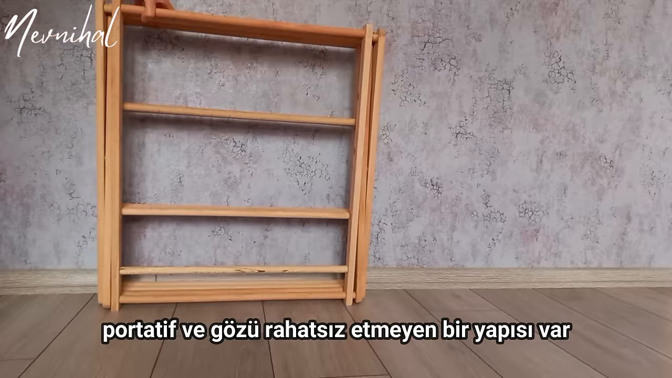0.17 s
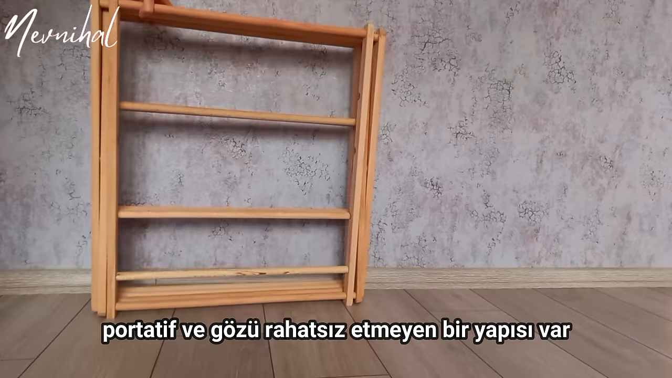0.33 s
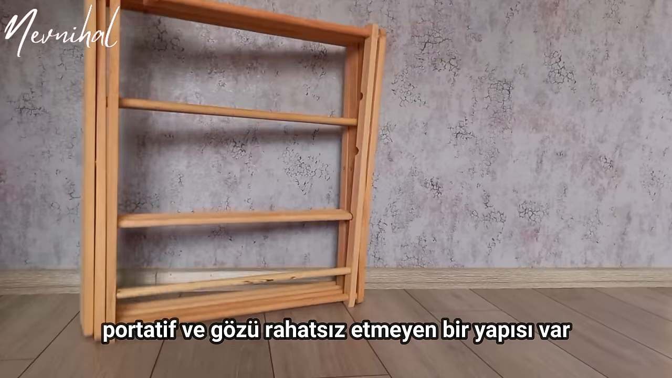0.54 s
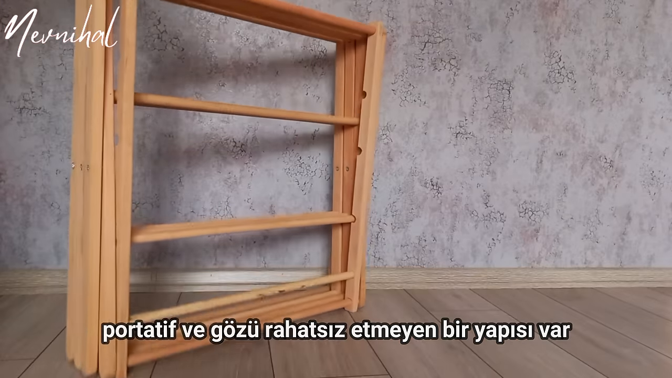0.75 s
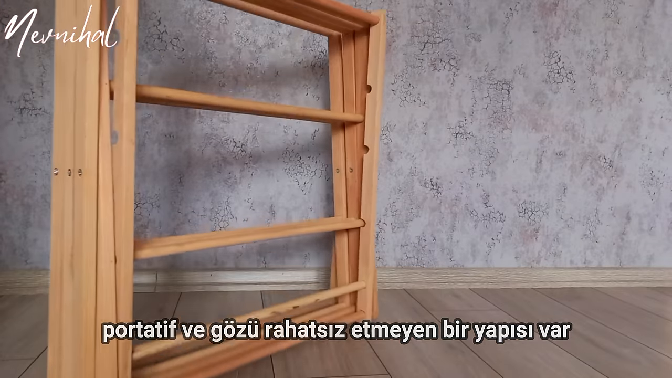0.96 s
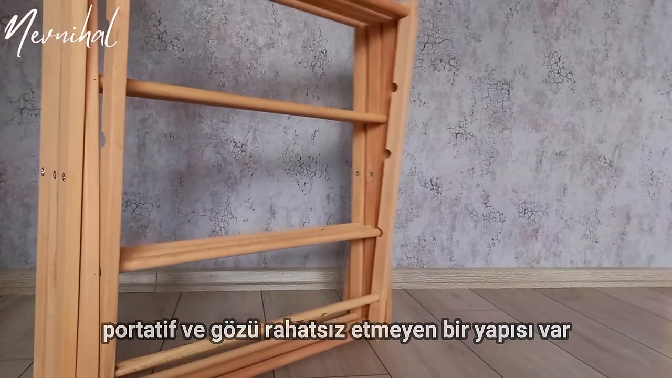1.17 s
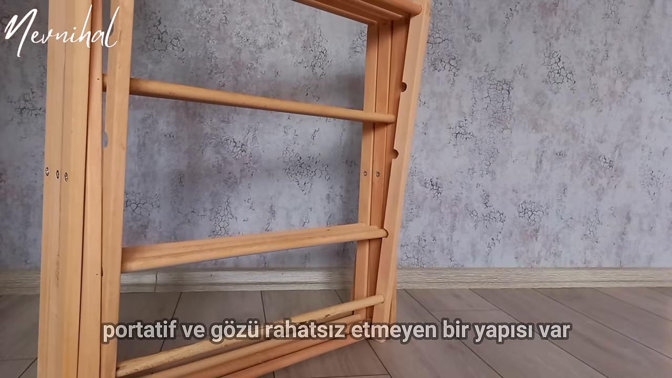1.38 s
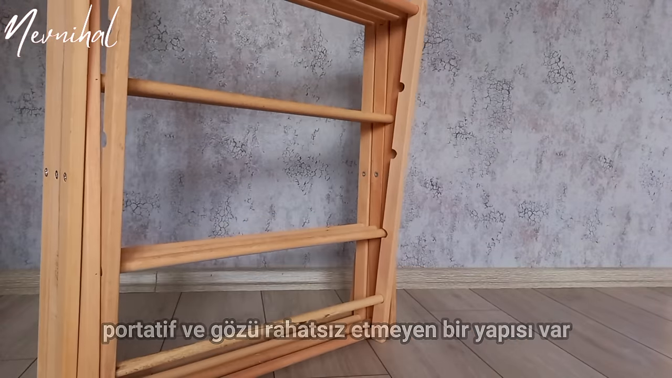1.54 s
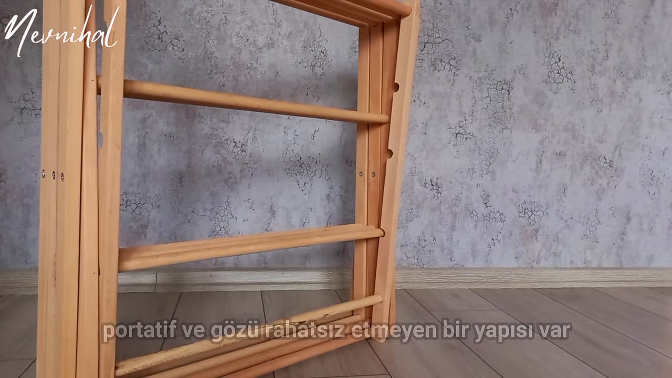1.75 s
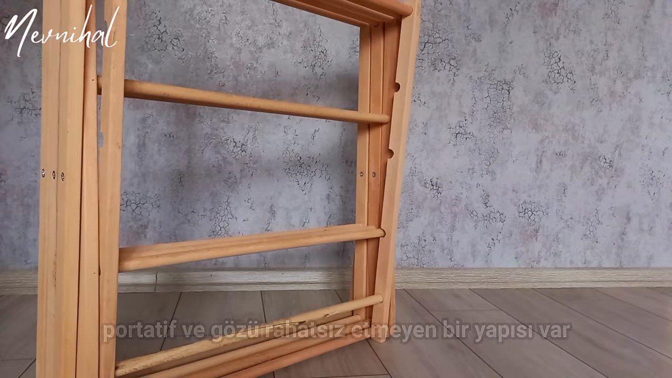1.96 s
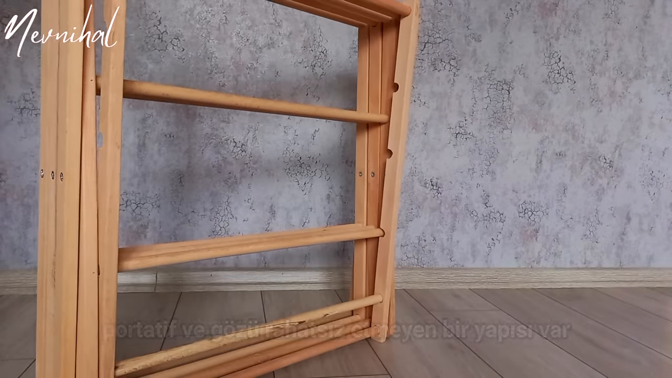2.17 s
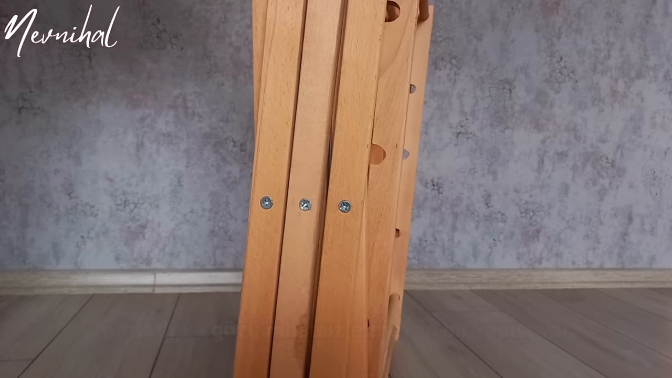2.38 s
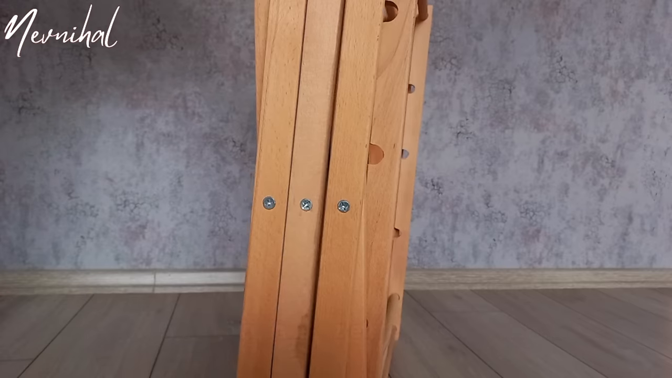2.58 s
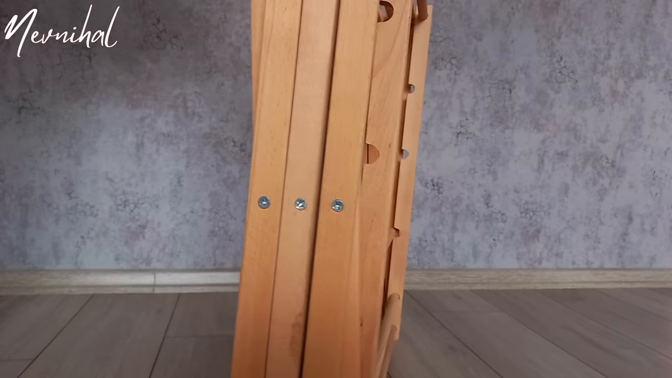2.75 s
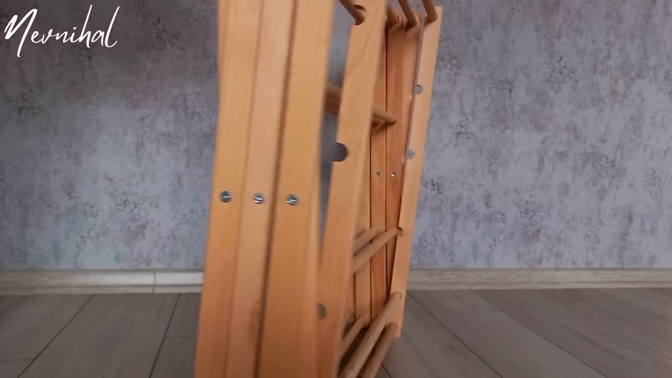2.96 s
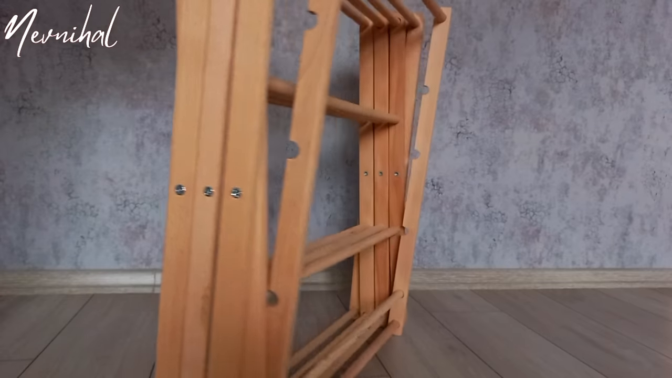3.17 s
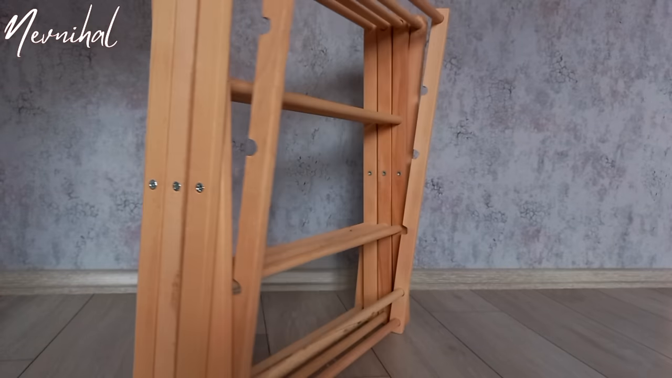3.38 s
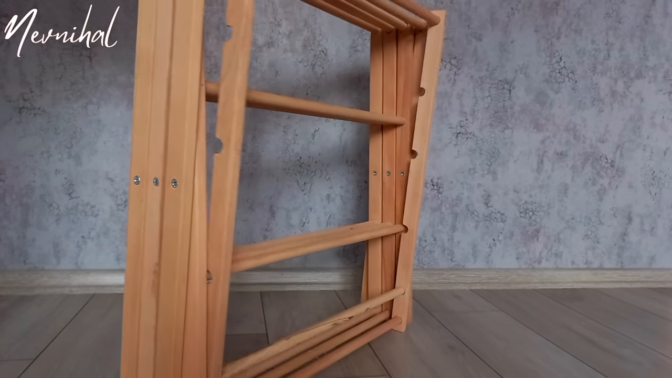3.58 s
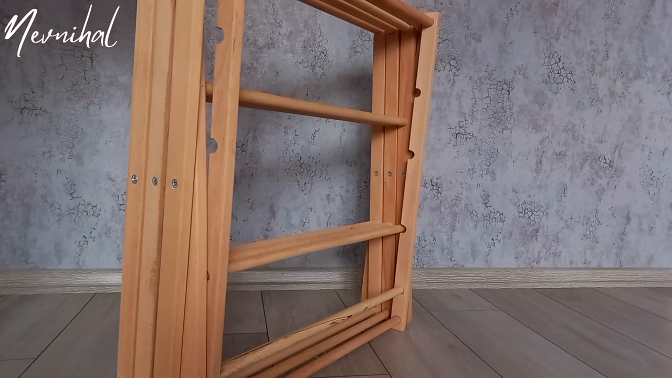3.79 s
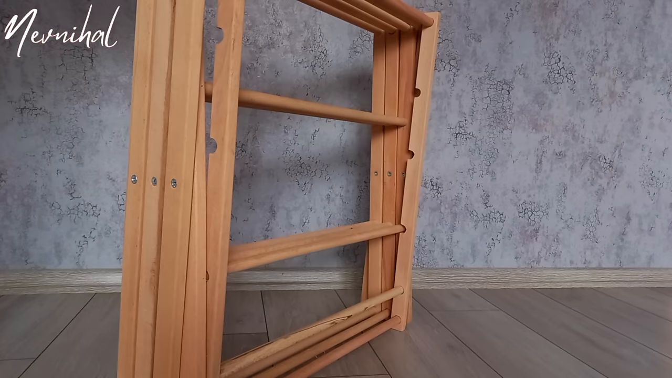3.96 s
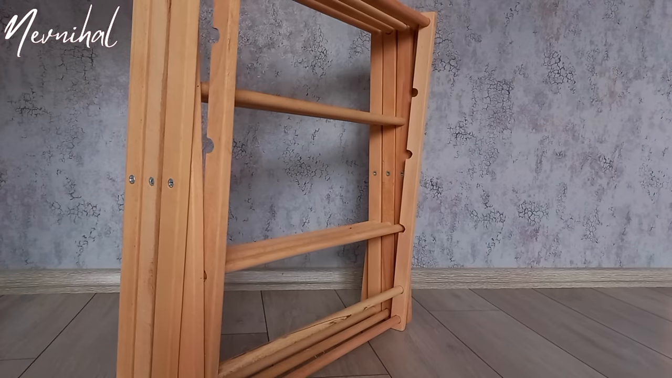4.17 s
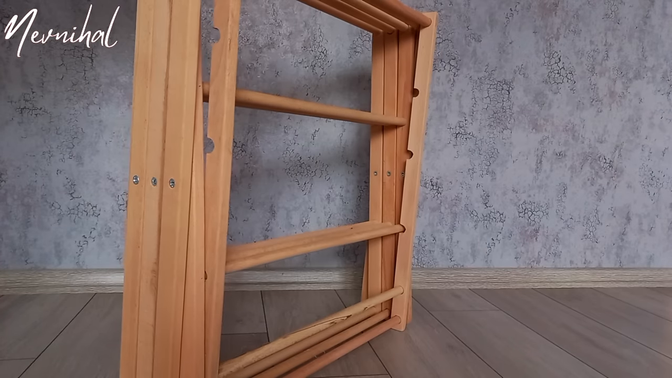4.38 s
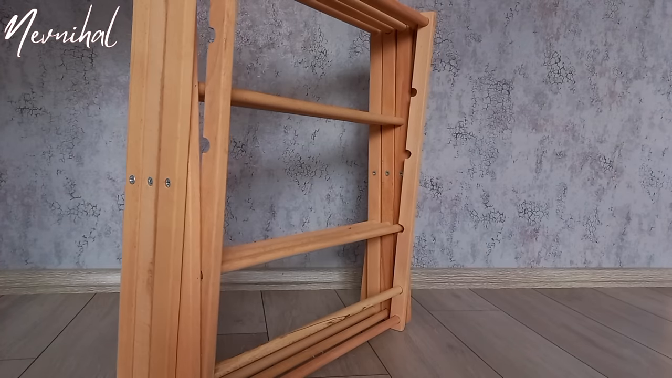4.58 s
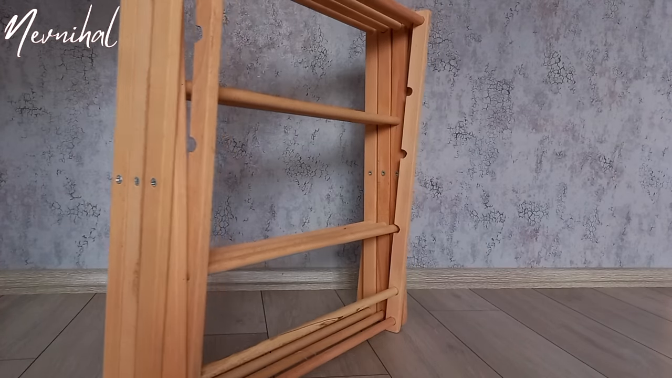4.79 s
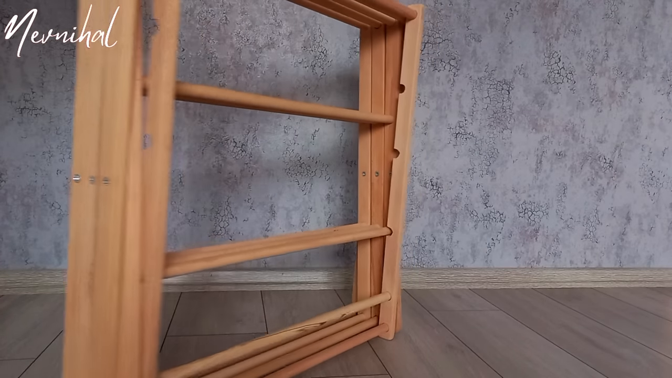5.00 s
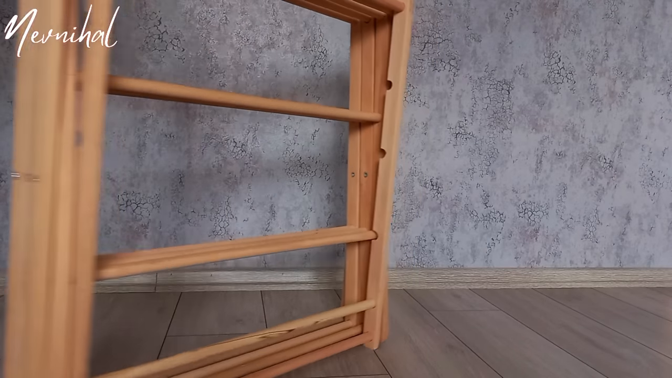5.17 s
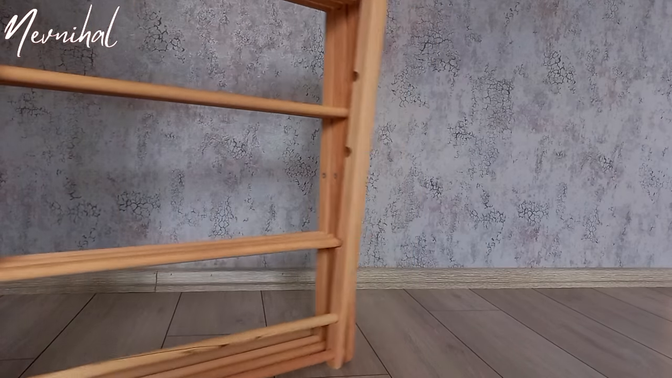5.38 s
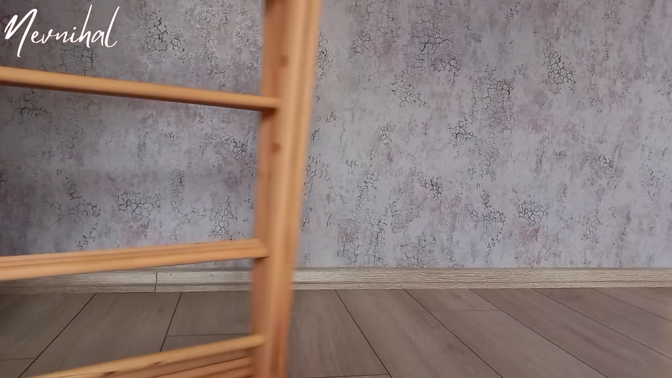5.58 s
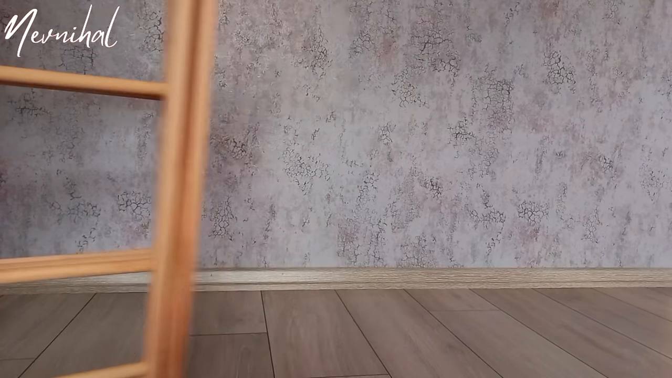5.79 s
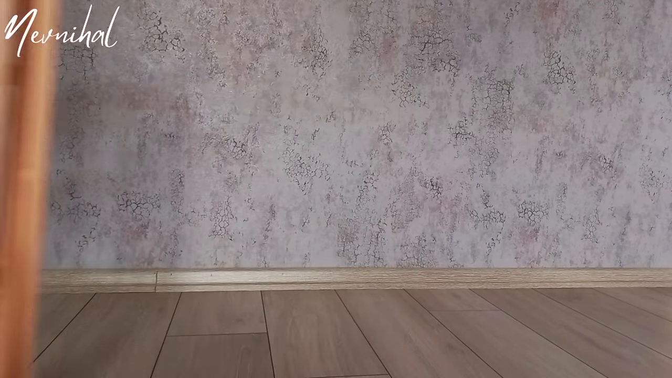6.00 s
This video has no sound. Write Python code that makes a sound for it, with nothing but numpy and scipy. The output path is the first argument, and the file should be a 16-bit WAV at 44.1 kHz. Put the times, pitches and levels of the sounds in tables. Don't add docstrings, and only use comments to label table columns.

```python
import sys
import numpy as np
from scipy import signal
from scipy.fft import rfft, irfft, next_fast_len
from scipy.io import wavfile
from scipy.ndimage import uniform_filter1d

SR = 44100
rng = np.random.default_rng(int(sys.argv[2]) if len(sys.argv) > 2 else 0)


def attenuation_scalar(level_db):
    decades = np.asarray(level_db, float) / 20
    return 10 ** decades


def wav_record(signal):
    frames = np.transpose(np.atleast_2d(signal))
    bounded = np.clip(frames, -1, 1)
    quanta = np.round(bounded * 32767).astype(np.int16)
    wavfile.write(sys.argv[1], SR, quanta)


N = 266187

# time_s, speed_db (as scrape level), load_db (on the feet, as shake level)
DRAGS = [
    [(0.22, -64, -55), (0.374, -42, -30.5), (0.486, -41.5, -30.5), (0.56, -36, -26.5), (0.696, -37, -23),
     (0.844, -33, -29), (0.866, -34.5, -22), (1.112, -41, -26.5), (1.15, -33, -33)],
    [(2.84, -59, -66), (2.858, -59.5, -55.5), (2.934, -47, -39.5), (3.026, -42, -23), (3.112, -41.5, -26),
     (3.194, -41, -28), (3.636, -44, -32), (3.674, -51, -58), (3.72, -52, -49)],
    [(4.79, -75, -74.5), (4.806, -59, -63), (4.892, -45, -41.5), (5.566, -30, -18), (5.618, -34, -33),
     (5.666, -26, -15), (5.714, -31, -19), (5.814, -29.5, -18.5), (6.036, -27.5, -17)],
]
# boom_over_load_db, rattle_over_load_db, dust_db (at speed -35 dB), dust_share (of speed swing)
FOOTING = [
    (-1.5, -4, -45.5, 1),
    (-5.5, -1.5, -43, .9),
    (-1.5, -4, -41, 0.64),
]
# pitch_hz, density_db (per Hz)
FRAME_SPECTRA = [
    [(76, -37.5), (130, 7.5), (211, -11), (294, 0), (381, -16), (533, 0), (801, -4), (907, -2.5),
     (2500, -16.5), (3250, -57), (5500, -120)],
    [(76, -31.5), (130, -0.5), (270, -0.5), (317, -10), (574, -2.5), (801, -2.5), (1950, -19), (2130, -11),
     (2500, -25.5), (3250, -77), (5500, -120)],
    [(76, -41), (130, -2.5), (257, -8.5), (294, -2.5), (421, -22.5), (546, -6.5), (801, -8), (1420, -15),
     (2500, -14.5), (3250, -32), (5500, -120)],
]
# pitch_hz, level_db, t60_s
BOARD_MODES = [(49.6, -15.5, 0.16), (80, -4.5, 0.15), (90, -2.5, 0.081), (105, 6.5, 0.078),
               (136, -3.5, 0.091), (157.7, -13.5, 0.075)]
# pitch_hz, level_db, t60_s
WOOD_MODES = [(217, 0, .09), (293, 0, .09), (360, 1, .08), (450, 0, .07), (560, 1, .06), (700, 0, .05),
              (800, 1, .05), (1000, 0, .04), (1320, 0, .04), (1550, -2, .03), (1900, -2, .03),
              (2080, 0, .035), (2330, -3, .03), (2600, -1, .03), (2900, -3, .025), (3200, -3, .025),
              (3700, -4, .02), (4330, -6, .015), (5200, -8, .01)]
# pitch_hz, density_db (per Hz)
SCRAPE_SPECTRUM = [(880, 0.5), (1500, -4), (2000, -5), (2250, -10), (2770, 1), (3280, -0.5), (4630, -1),
                   (6050, -13.5), (8550, -14.5), (10500, -21.5), (12800, -20.5), (15200, -26.5),
                   (16000, -24.5)]
# start_s, end_s, pitch_hz, width_hz, level_db
SQUEAKS = [(0.423, 0.64, 1032, 120, -43), (0.484, 0.54, 3710, 90, -44), (1.098, 1.17, 2725, 97.2, -48),
           (1.6, 1.702, 2870, 119.8, -67), (1.666, 1.784, 2110, 55.6, -75), (2.49, 2.565, 3390, 300, -58),
           (2.926, 3.332, 2116, 69, -47), (4.448, 4.74, 2760, 80, -76.5), (4.603, 4.743, 1255, 69, -65),
           (4.778, 5.153, 2870, 162, -40.5), (4.873, 5.06, 2265, 30, -49), (4.96, 5.2, 1910, 41, -44.5),
           (4.95, 5.3, 4600, 50, -58), (5.13, 5.444, 2880, 103, -37.5)]
# start_s, peak_db, pitch_hz (strongest), hardness_octaves (reached above it), thump_db (floor)
THUDS = [(.101, -15.5, 726, 1.37, -30), (.185, -26.5, 414, 1.5, -46), (.45, -38, 407, 0.62, -24),
         (.3, -32, 249, 1, -50), (.483, -17.5, 497, 1.26, -20), (1.165, -17, 507, 1.1, -30),
         (1.195, -16.5, 301, 1.86, -15), (1.697, -38.5, 347, 1.6, -38), (2.248, -45.5, 463, 0.83, -39),
         (2.29, -44.5, 396, 0.66, -48.5), (2.641, -38, 500, 1.6, -53), (2.659, -30, 300, 5.1, -41),
         (3.8, -18.5, 300, 1.8, -21.5), (3.86, -17, 325, 4.2, -29.5), (4.129, -32.5, 390, 0.48, -41.5),
         (4.207, -29, 370, 1.9, -49), (4.715, -48.5, 450, 1.2, -64), (5.27, -15.5, 604, 1.4, -25),
         (5.42, -9.5, 528, 4, -32), (5.47, -15, 1000, 1.3, -31.5), (5.715, -6.5, 490, 0.75, -18),
         (5.875, -7, 825, 1.35, -13.5), (5.96, -9.5, 790, 1.3, -18)]
# start_s, peak_db, pitch_hz, hardness_octaves, thump_db
CLACKS = [(.075, -31, 1260, 0.9, -62), (.084, -20, 2420, 0.23, -60), (.87, -22, 9060, .7, -70),
          (1.222, -22.5, 2500, 1.1, -61.5), (2.364, -49.5, 2700, 1.3, -66), (2.686, -26, 860, 1.95, -57.5),
          (2.708, -42, 9360, 0.37, -60.5), (3.746, -6.5, 2260, 0.39, -28.5), (3.757, -4, 2450, 0.53, -40),
          (4.146, -29, 1570, 0.6, -56.5), (4.17, -57, 8000, .4, -70.5), (4.294, -28.5, 870, 0.6, -52),
          (4.41, -27.5, 1000, 1.7, -63)]
# start_s, peak_db, pitch_hz, hardness_octaves, thump_db
SLAPS = [
    (1.156, -11, 696, 0.82, -25.5),
    (1.176, -8, 600, 1.7, -24),
    (1.212, -11.5, 2866, 0.21, -52.5),
    (1.215, -14.5, 2600, 1.1, -58),
    (2.681, -24.5, 1250, 0.84, -55),
    (3.297, -19.5, 617, 1.2, -48),
    (3.751, -3, 2590, 1.05, -34),
    (3.754, -9, 3525, 0.55, -49),
]
# start_s, length_s, rustle_db, swish_db (fine part)
STROKES = [(1.45, 0.14, -64, -63.5), (1.58, 0.31, -57, -62.5), (1.88, 0.28, -66, -67.5),
           (2.13, 0.079, -82, -63), (2.355, 0.051, -69.5, -81.5), (2.495, 0.11, -60.5, -62.5),
           (2.695, 0.033, -54, -55), (4.11, .12, -66, -65), (4.36, 0.069, -58.5, -60.5),
           (4.585, 0.13, -61.5, -67.5), (4.67, .13, -54, -67)]
# start_s, length_s, level_db
SHIFTS = [(-.04, 0.097, -41), (.07, 0.17, -44), (1.4, 0.11, -53), (1.54, 0.096, -60.5), (1.68, 0.14, -42),
          (2.24, 0.114, -48.5), (2.43, 0.17, -51), (2.64, 0.27, -52.5), (3.9, 0.2, -40.5),
          (4.11, 0.36, -50.5), (4.38, .17, -48.5), (4.66, .12, -60)]
# pitch_hz, density_db (per Hz)
RUSTLE_SPECTRUM = [(880, -55.5), (1500, -16.5), (1860, -20), (2180, -15.5), (2510, -17.5), (2800, -7.5),
                   (4770, -10), (5160, -15.5), (8720, -11), (9540, -16), (16000, -21)]
# pitch_hz, density_db (per Hz)
AIR_SPECTRUM = [(18, -45.5), (30, -20.5), (98, -2), (252, -20), (345, -12.5), (404, -21), (1190, -25),
                (2350, -29), (2670, -25), (5290, -38.5), (8490, -27), (9430, -31.5), (16000, -38)]
# pitch_hz, t60_s
ROOM_DECAY = [(60, 0.22), (200, 0.38), (600, 0.34), (1500, 0.36), (3500, 0.32), (7000, 0.31), (14000, 0.2)]
# pitch_hz, correlation
LIKENESS = [(60, 1), (150, 0.94), (380, 0.92), (950, 0.33), (2380, -0.031), (5980, 0.1), (15000, -0.38)]
# pitch_hz, left_minus_right_db
LEAN = [(60, 0.5), (180, 0.5), (550, 0.5), (1650, -0.5), (4970, 3), (15000, 3)]
DIFFUSE_EDGES_HZ = 35 * 2 ** np.arange(0, 9, .4)

AIR_DB = -62.5
SCRAPE_OVER_SPEED_DB = 2.5
SPLIT_HZ = 7000
STROKE_RISE, SHIFT_RISE = 0.23, 0.31
BELOW_DB, BELOW_GAIN_DB = 3, 0.8
MEMORY_DB_PER_S, MARGIN_DB, CUT_SHARE, DEEPEST_DB = 67.5, 13.5, 0.94, 9
CUTOFF_HZ = 15800
LEAD_S = 0.04


def drag_levels():
    rows = []
    for span, (boom, rattle, dust, share) in zip(DRAGS, FOOTING):
        rows.append((span[0][0] - LEAD_S, -90, -90, -90, -90))
        for s, speed, load in span:
            rows.append((s, load + boom, load + rattle, speed + SCRAPE_OVER_SPEED_DB, dust + share * (speed + 35)))
        rows.append((span[-1][0] + LEAD_S, -90, -90, -90, -90))
    times, *columns = np.transpose(rows)
    return [np.interp(np.arange(N) / SR, times, column) for column in columns]


def foot(boom_db, frame_db, scrape_db, dust_db):
    judder = drift(21.0)
    bumps = grains(350, 4.37)
    boom = rms_one(sum(attenuation_scalar(db) * ring(bumps, hz, t60) / np.sqrt(t60) for hz, db, t60 in BOARD_MODES))
    rungs = rms_one(sum(ring(bumps, hz, 0.13 * t60) / np.sqrt(t60) for hz, db, t60 in WOOD_MODES[1:8]))
    shaken = 0.17 * rungs + rms_one(bumps)
    frame = np.zeros(N)
    for span, spectrum in zip(DRAGS, FRAME_SPECTRA):
        part = slice(int((span[0][0] - LEAD_S) * SR), int((span[-1][0] + LEAD_S) * SR))
        frame[part] = colour(shaken[part], spectrum)
    hiss = two_part(colour(grains(9000, 1.6), SCRAPE_SPECTRUM), scrape_db, dust_db)
    boom_gain = attenuation_scalar(boom_db + 0.65 * judder)
    frame_gain = attenuation_scalar(frame_db + 1.0 * judder + 3.3 * drift(30))
    hiss_gain = attenuation_scalar(2.2 * judder + 0.27 * drift(7.4))
    return boom_gain * boom + frame_gain * frame + hiss_gain * hiss


def squeaks():
    out = np.zeros(N)
    slips = grains(3000, 2.9) * attenuation_scalar(1.0 * drift(30))
    for start, end, hz, width_hz, db in SQUEAKS:
        part = slice(int(start * SR), int(end * SR))
        t60 = 2.4 / width_hz
        sung = ring(ring(slips[part], hz, t60), hz, t60)
        out[part] += attenuation_scalar(db) * rms_one(sung) * signal.windows.tukey(len(sung), .7)
    return out


def knocks(table, chatter, chatter_s):
    out, push = np.zeros(N + SR), np.zeros(N)
    length = 8192
    t = np.arange(length) / SR
    hz_axis = np.fft.rfftfreq(length, 1 / SR) + 1
    for s, peak_db, pitch, hard, thump_db in table:
        contact = chatter * rng.standard_normal(length) * np.exp(-t / chatter_s)
        contact[0] = 1
        modes = np.zeros(length)
        for hz, db, t60 in WOOD_MODES:
            luck_db = 3 * rng.standard_normal()
            modes += attenuation_scalar(db + luck_db) * ring(contact, hz, t60) * 10 / (t60 * SR)
        octaves = np.log2(hz_axis / pitch)
        below_slope = BELOW_DB + BELOW_GAIN_DB * np.log2(pitch / 1000)
        shape_db = below_slope * np.minimum(octaves, 0) - 6.7 * np.maximum(octaves, 0)
        shape_db -= 10 * np.log10(1 + 2 ** (5.54 * (octaves - hard)))
        cepstrum = irfft(np.log(attenuation_scalar(shape_db)))
        cepstrum[1:length // 2] *= 2
        response = np.exp(rfft(cepstrum[:length // 2], length))
        body = irfft(rfft(contact + modes) * response)
        start = round(s * SR)
        out[start:start + length] += attenuation_scalar(peak_db + 4.5) * body / np.abs(body).max()
        push[start] = attenuation_scalar(thump_db - 2.5)
    thump = sum(attenuation_scalar(db) * ring(push, hz, .5 * t60) for hz, db, t60 in BOARD_MODES)
    return out[:N] + thump


def hand():
    rustle_db, swish_db = swells(STROKES, STROKE_RISE)
    creak_db, = swells(SHIFTS, SHIFT_RISE)
    creak = rms_one(sum(attenuation_scalar(db) * ring(grains(400, 2.3), hz, t60) for hz, db, t60 in BOARD_MODES))
    brush = two_part(colour(grains(16000, 1.5), RUSTLE_SPECTRUM), rustle_db, swish_db)
    return attenuation_scalar(0.61 * drift(23)) * brush + attenuation_scalar(creak_db) * creak


def air():
    return attenuation_scalar(AIR_DB) * colour(diffuse(N, decay=0), AIR_SPECTRUM)


def place(x, lag_s, wet_db):
    tail = diffuse(SR, decay=0.94) * (1 - np.exp(-np.arange(SR) / SR / 0.0016))
    echo = attenuation_scalar(wet_db) * tail / np.sqrt(np.mean(np.sum(tail ** 2, axis=1)))
    echo[0, 0] = 1
    echo[1, max(round(lag_s * SR), 0)] = 1
    return signal.fftconvolve(x[None], echo, axes=1)[:, :N] / np.sqrt(1 + attenuation_scalar(2 * wet_db))


def diffuse(length, decay):
    out, t = 0, np.arange(length) / SR
    settle = 4000
    white = rng.standard_normal((2, 2, length + settle))
    for k, (low, high) in enumerate(zip(DIFFUSE_EDGES_HZ, DIFFUSE_EDGES_HZ[1:])):
        band = signal.butter(2, [low, high], "band", fs=SR, output="sos")
        mid, side = signal.sosfilt(band, white[k % 2])[:, settle:]
        hz = np.sqrt(low * high)
        alike = np.clip(at_hz(LIKENESS, hz), -1, 1)
        fade = attenuation_scalar(-60 * decay * t / at_hz(ROOM_DECAY, hz))
        out = out + fade * (np.sqrt(1 + alike) * mid + np.sqrt(1 - alike) * side * [[1], [-1]])
    return out


def grains(per_s, spread_db):
    sizes = attenuation_scalar(spread_db * np.minimum(rng.exponential(1, N), 3.8)) * rng.choice([-1, 1], N)
    return sizes * (rng.random(N) < per_s / SR)


def ring(clicks, hz, t60):
    r, w = attenuation_scalar(-60 / (t60 * SR)), 2 * np.pi * hz / SR
    return signal.lfilter([0, np.sin(w)], [1, -2 * r * np.cos(w), r * r], clicks + 1e-18)


def drift(rate):
    r = np.exp(-80 * np.pi * rate / SR)
    slow = signal.lfilter([1], [1, -2 * r, r * r], rng.standard_normal(N // 40 + 2002))[2000:]
    return np.interp(np.arange(N) / 40, np.arange(len(slow)), rms_one(slow))


def swells(rows, rise):
    t, out = np.arange(N) / SR, 1e-5
    for s, length, *db in rows:
        phase = np.interp(t, [s, s + rise * length, s + length], [0, .5, 1])
        out = out + np.outer(attenuation_scalar(np.array(db)), np.sin(np.pi * phase) ** 1.2)
    return 20 * np.log10(out)


def two_part(x, coarse_db, fine_db):
    low = signal.sosfilt(signal.butter(4, SPLIT_HZ, fs=SR, output="sos"), x)
    high = signal.sosfilt(signal.butter(4, SPLIT_HZ, "high", fs=SR, output="sos"), x)
    return attenuation_scalar(coarse_db) * rms_one(low) + attenuation_scalar(fine_db) * rms_one(high)


def colour(x, spectrum):
    length = x.shape[-1]
    size = next_fast_len(length)
    gain = attenuation_scalar(at_hz(spectrum, np.fft.rfftfreq(size, 1 / SR)))
    return rms_one(irfft(rfft(x, size) * gain, size)[..., :length])


def at_hz(points, hz):
    table_hz, values = np.transpose(points)
    return np.interp(np.log(np.maximum(hz, 1)), np.log(np.maximum(table_hz, 1)), values)


def rms_one(x):
    return x / np.sqrt(np.mean(x ** 2) + 1e-20)


def suppress(x):
    level = 10 * np.log10(uniform_filter1d(np.mean(x ** 2, axis=0), size=1500) + 1e-12)
    fade = MEMORY_DB_PER_S * np.arange(N) / SR
    under = np.maximum.accumulate(level + fade) - fade - level
    cut = np.clip(CUT_SHARE * (under - MARGIN_DB), 0, DEEPEST_DB)
    return x * attenuation_scalar(-uniform_filter1d(cut, size=2000))


def scene():
    levels = drag_levels()
    near = place(attenuation_scalar(-5.0) * foot(*levels), lag_s=.00042, wet_db=6.0)
    far = place(attenuation_scalar(-2.5) * foot(*levels) + squeaks() + hand(), lag_s=0.00013, wet_db=6.5)
    thuds = knocks(THUDS, chatter=0.04, chatter_s=0.021)
    clacks = knocks(CLACKS, chatter=0.36, chatter_s=0.0026)
    blows = place(thuds + clacks, lag_s=.00005, wet_db=6.0)
    slaps = place(knocks(SLAPS, chatter=0.35, chatter_s=0.0026), lag_s=.00003, wet_db=-3)
    return near + far + blows + slaps + air()


def top_cut(x):
    return signal.sosfilt(signal.butter(12, 16100, fs=SR, output="sos"), x)


def record(dry):
    size = next_fast_len(N)
    hz = np.fft.rfftfreq(size, 1 / SR)
    lean = attenuation_scalar(np.outer([.5, -.5], at_hz(LEAN, hz)))
    leaned = irfft(rfft(dry, size) * lean, size)[:, :N]
    microphones = signal.sosfilt(signal.butter(5, 58, "high", fs=SR, output="sos"), leaned)
    rounded = np.tanh(suppress(microphones) * 0.88) / 0.91
    mix = irfft(rfft(rounded, size) * (hz < CUTOFF_HZ), size)[:, :N]
    return top_cut(mix)


dry = scene()
out = record(dry)
wav_record(out)
```